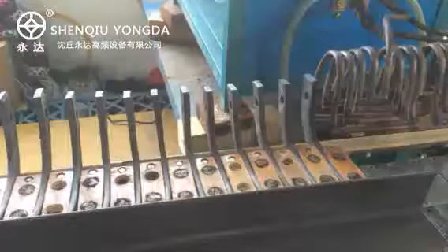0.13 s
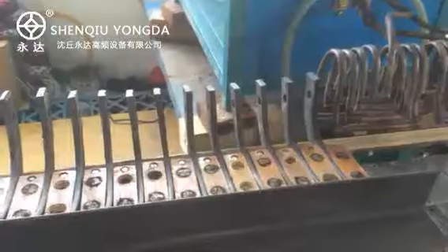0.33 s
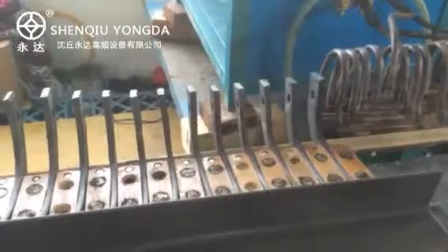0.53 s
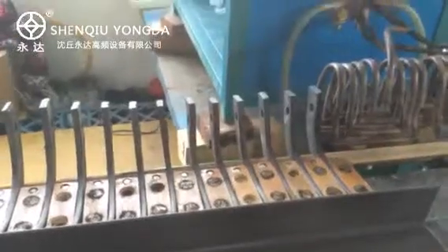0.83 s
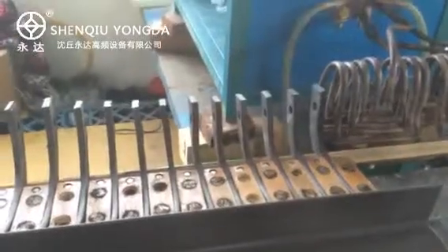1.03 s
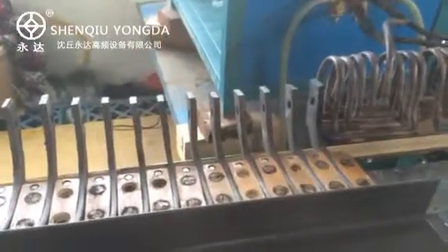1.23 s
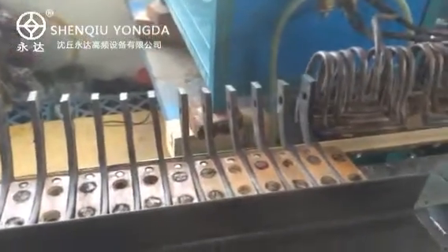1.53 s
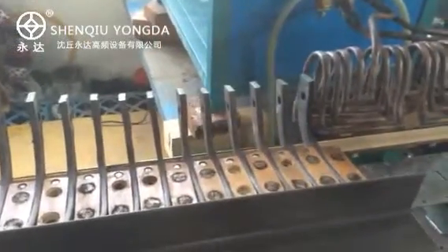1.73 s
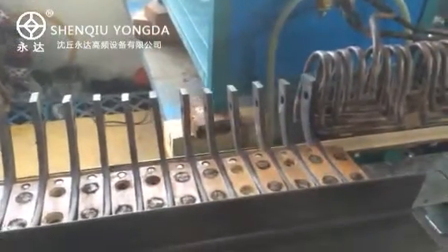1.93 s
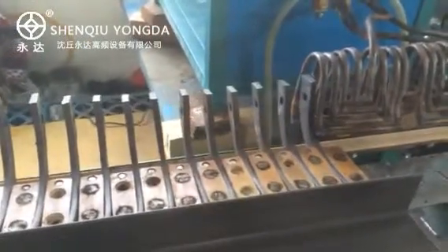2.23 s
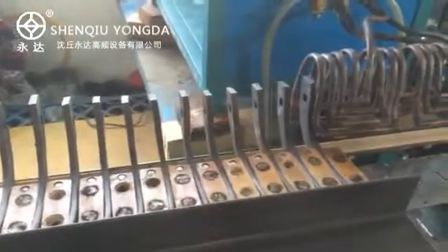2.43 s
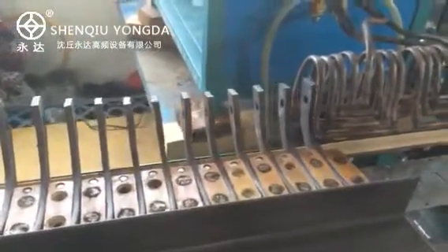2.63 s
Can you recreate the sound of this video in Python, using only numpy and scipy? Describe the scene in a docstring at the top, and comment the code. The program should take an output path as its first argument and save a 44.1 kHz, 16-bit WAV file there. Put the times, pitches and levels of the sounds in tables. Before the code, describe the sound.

An industrial induction heating line runs close to the microphone in a workshop. After brief silence it cuts in abruptly at 0.14 seconds, then holds a low fan roar, motor hum, hollow duct resonance, coolant rush and fine hiss, with pipes and steel ringing faintly. A rough whine near 6 kHz is strongest around 0.6 seconds, fading after 1.8, while thinner whistles trade strength until the end.

```python
"""In a workshop, with the microphone close by, an induction heating line runs steadily; it cuts in abruptly.
Fans and pumps make shaped noise and steady tones over a motor's hum, a set of multiples of its shaft rate.
Air sounds the ducts, coolant rushes and hisses, and noise rings the resonances of the frame and pipework.
In front, a jittering sine near 6 kHz, probably coolant forced through a valve, whines and slowly fades
while thinner, higher whistles trade strength."""
import sys
import numpy as np
from scipy import signal
from scipy.fft import rfft, irfft, next_fast_len
from scipy.io import wavfile
from scipy.ndimage import uniform_filter1d, map_coordinates

SR = 44100
rng = np.random.default_rng(int(sys.argv[2]) if len(sys.argv) > 2 else 0)


def unload_wav(signal):
    """Save mono or channel-first audio to the path in sys.argv[1] as 16-bit WAV at rate SR, clipped to [-1, 1]."""
    wavfile.write(
        sys.argv[1],
        SR,
        np.round(np.clip(np.atleast_2d(signal).T, -1, 1) * 32767).astype(np.int16),
    )


N = 122157  # samples

# Spectrum shape of the fans' roar: pitch_hz [Hz], level_db [dB, relative]
ROAR_SPECTRUM = [(20, -31), (45, -13), (105, -10.5), (135, -1.5), (175, -1), (290, -0.5), (380, -7.5),
                 (480, -17), (700, -25.5), (2000, -51)]
# Level of the roar: time_s [s], level_db [dB]
ROAR_LEVEL = [(.14, -28.5), (.5, -29), (1.1, -27.5), (1.65, -27), (2.1, -28), (2.77, -30)]
# Steady tones of other fans and pumps: pitch_hz [Hz], level_db [dB]
FAN_TONES = [(123, -43), (158, -38), (197, -41), (217, -40.5), (290, -43.5), (309, -38.5), (592, -46.5)]
# Motor hum: order [multiple of the shaft rate], level_db [dB]
MOTOR_ORDERS = [(2, -45), (4, -38.5), (6, -37.5), (8, -42.5), (9, -44)]
# Hollow resonances of the ducts: pitch_hz [Hz], width_hz [Hz], level_db [dB]
DUCTS = [(626.5, 40, -40.5), (809, 31, -39.5), (908, 64, -43.5)]
# How hard the flow drives the ducts: time_s [s], drive_db [dB]
DUCT_DRIVE = [(.14, -0.59), (.9, 2.1), (1.4, -.5), (2.1, -1.9), (2.77, 1)]
# Spectrum shape of the rush of air and coolant: pitch_hz [Hz], level_db [dB, relative]
RUSH_SPECTRUM = [(200, -15.5), (520, -4), (720, -1.5), (950, 1), (1150, -3), (1700, -6), (2300, -5),
                 (2650, -11.5), (3200, -12.5), (4400, -11), (5200, -17.5), (7000, -27), (15000, -55)]
# Level of the rush: time_s [s], level_db [dB]
RUSH_LEVEL = [(.14, -29), (.8, -30), (1.4, -30), (1.9, -30.5), (2.77, -29)]
# Spectrum shape of the fine spray hiss: pitch_hz [Hz], level_db [dB, relative]
HISS_SPECTRUM = [(2500, -23), (5000, -3.5), (6400, 8), (6830, -7.5), (7200, -1), (8100, 2), (9300, -3.5),
                 (10300, 2.5), (11200, -2.5), (13400, -3.5), (14300, 0), (15300, -4.5)]
# Level of the hiss: time_s [s], level_db [dB]
HISS_LEVEL = [(.14, -39.5), (1.3, -38.5), (2.1, -38), (2.77, -38)]
# Resonances of frame and pipework: pitch_hz [Hz], width_hz [Hz], level_db [dB]
FRAME = [(1414, 38, -45), (1844, 15, -48), (1956, 32, -41.5), (2010, 29, -44.5), (2212, 41, -48.5),
         (2284, 20, -39.5), (2472, 17, -50.5)]
# Thin ringing of the steel bars and coil: pitch_hz [Hz], level_db [dB]
STEEL = [(3390, -52.5), (3685, -51.5), (3935, -54.5), (4112, -47), (4243, -48), (4345, -49.5),
         (4380, -50.5), (4694, -52), (4985, -63.5), (7870, -52), (8280, -55.5), (8600, -56.5), (9920, -57),
         (11530, -52), (12000, -62), (12780, -55), (13500, -59), (15130, -62)]
# Times of the whistle levels: time_s [s]
WHISTLE_TIMES = [.4, 1.3, 1.9, 2.6]
# Higher whistles: pitch_hz [Hz], width_hz [Hz], then level_db [dB] at each of the four times
WHISTLES = [(6198, 40, -47.5, -38.5, -46.5, -43), (6477, 24, -53, -59, -46, -40),
            (10150, 110, -45.5, -47, -61, -70), (10940, 60, -62, -64, -46, -53),
            (14050, 50, -56, -55, -55, -45), (14240, 90, -51, -52, -52, -53),
            (14440, 80, -47, -50, -54, -62)]
# The main whine: time_s [s], pitch_hz [Hz], level_db [dB]
WHINE = [(.14, 6070, -40), (.35, 6110, -39), (.6, 6092, -34), (.85, 6110, -37), (1.15, 6100, -36.5),
         (1.55, 6140, -39), (1.8, 6160, -38), (2.0, 6130, -45.5), (2.77, 6160, -52)]

START_S, TOP_HZ = 0.1435, 15400  # the cut-in, and the upper band limit
SHAFT_HZ, SHAFT_DRIFT = 44.77, 0.003  # motor turns a second, relative unsteadiness
HISS_RIPPLE_DB, HISS_RIPPLE_HZ = 2, 75.3  # depth and knot spacing of the ripple in the hiss
STEEL_WIDTH_HZ = 13.3  # at the lowest steel pitch; widens in proportion to pitch
WHISTLE_FLUTTER_DB = 3.5
WHINE_JITTER_HZ, WHINE_JITTER_RATE, WHINE_FLUTTER_DB = 36.04, 170, 3  # rate in knots a second


def amp(db):
    """Decibels to gain."""
    return 10 ** (np.asarray(db) / 20)


def unit(x):
    """Scale to rms 1."""
    return x / np.sqrt(np.mean(x ** 2) + 1e-20)


def curves(rows):
    """One value per sample for each column after the time."""
    time_s, *columns = np.transpose(rows)
    return [np.interp(np.arange(N) / SR, time_s, column) for column in columns]


def wobble(rate):
    """A smooth random curve through normal draws, rate knots a second."""
    knots = rng.standard_normal(4096)
    return map_coordinates(knots, [np.arange(N) * rate / SR], mode="mirror")


def filtered(x, response):
    """Multiply the spectrum of x by a response of frequency."""
    size = next_fast_len(N + 8192)
    spectrum = rfft(x, size) * response(np.fft.rfftfreq(size, 1 / SR))
    return irfft(spectrum, size)[:N]


def flow(spectrum, patchy_db):
    """Turbulence: coloured noise of rms 1 with time-frequency patches of random gain."""
    bins = signal.stft(rng.standard_normal(N), nperseg=512)[2]
    patches = uniform_filter1d(rng.standard_normal(bins.shape), size=8, axis=0)  # across pitch
    patches = uniform_filter1d(patches, size=10, axis=1)  # across time
    noise = signal.istft(bins * amp(patchy_db * unit(patches)), nperseg=512)[1][:N]
    hz, db = np.transpose(spectrum)
    return unit(filtered(noise, lambda f: amp(np.interp(np.log(f + 1), np.log(hz), db))))


def ringing(hz, width_hz):
    """One resonance kept ringing by turbulence, rms 1; gain is a third at width_hz off pitch."""
    noise = rng.standard_normal(N)
    return unit(filtered(noise, lambda f: 1 / (1 + ((f - hz) / width_hz) ** 2 * 2)))


def tone(hz):
    """A sine of rms 1 on a pitch curve, from a random phase."""
    turns = np.cumsum(hz) / SR + rng.random()
    return np.sqrt(2) * np.sin(2 * np.pi * turns)


def combed(x):
    """Many short echoes off the steel leave a fine, fixed ripple in the spectrum."""
    knots = rng.standard_normal(2048)

    def ripple(f):
        return np.tanh(map_coordinates(knots, [f / HISS_RIPPLE_HZ], mode="mirror"))

    return unit(filtered(x, lambda f: amp(HISS_RIPPLE_DB * unit(ripple(f)))))


def fans():
    """Low turbulent roar with a few steady blade tones."""
    level_db, = curves(ROAR_LEVEL)
    out = amp(level_db + 0.4 * wobble(11.9)) * flow(ROAR_SPECTRUM, patchy_db=1.77)
    for hz, db in FAN_TONES:
        out += amp(db + 3.1 * wobble(5.04)) * tone(hz * (1 + 0.005 * wobble(7)))
    return out


def motor():
    """Hum at multiples of one slightly unsteady shaft rate."""
    shaft_hz = SHAFT_HZ * (1 + SHAFT_DRIFT * wobble(3.905))
    return sum(amp(db + 2.4 * wobble(4.99)) * tone(round(order) * shaft_hz) for order, db in MOTOR_ORDERS)


def ducts():
    """Air sounds the hollow resonances of the ducts, driven by a shared slow curve."""
    drive_db, = curves(DUCT_DRIVE)
    return sum(amp(db + drive_db) * ringing(hz, width_hz) for hz, width_hz, db in DUCTS)


def coolant():
    """Broad rush and fine, rippled hiss of turbulent flow."""
    rush_db, = curves(RUSH_LEVEL)
    hiss_db, = curves(HISS_LEVEL)
    rush_gain = amp(rush_db + 0.25 * wobble(8.9) + 0.9 * wobble(130))
    hiss_gain = amp(hiss_db + 0.4 * wobble(90))
    rush = rush_gain * flow(RUSH_SPECTRUM, patchy_db=0.9)
    return rush + hiss_gain * combed(flow(HISS_SPECTRUM, patchy_db=1.0))


def steelwork():
    """Turbulence keeps the frame, pipes, bars and coil ringing without pause."""
    frame = sum(amp(db) * ringing(hz, width_hz) for hz, width_hz, db in FRAME)
    relative_width = STEEL_WIDTH_HZ / STEEL[0][0]
    return frame + sum(amp(db) * ringing(hz, relative_width * hz) for hz, db in STEEL)


def whistles():
    """Thin whistles jitter about fixed pitches and trade strength slowly."""
    out = np.zeros(N)
    for hz, width_hz, *levels_db in WHISTLES:
        level_db, = curves(list(zip(WHISTLE_TIMES, levels_db)))
        pitch_hz = hz + 0.454 * width_hz * wobble(2 * width_hz)
        flutter = amp(WHISTLE_FLUTTER_DB * wobble(width_hz))  # wider whistles also flutter faster
        out += amp(level_db) * unit(flutter * tone(pitch_hz))
    return out


def whine():
    """A rough whistle whose pitch jitters quickly and creeps up as it fades."""
    pitch_hz, level_db = curves(WHINE)
    jittered_hz = pitch_hz + WHINE_JITTER_HZ * wobble(WHINE_JITTER_RATE)
    flutter = amp(WHINE_FLUTTER_DB * wobble(110))
    return amp(level_db) * unit(flutter * tone(jittered_hz))


def scene():
    """All parts of the line run together, from the background to the whine in front."""
    background = fans() + motor() + ducts() + coolant() + steelwork()
    return (background + whistles() + whine())[None]


def record(dry):
    """The sound cuts in over 2.5 ms; a steep low-pass removes what lies above the band limit."""
    opened = np.clip((np.arange(N) / SR - START_S) / 0.0025 + 0.5, 0, 1)
    return filtered(dry[0] * opened, lambda f: 1 / (1 + (f / TOP_HZ) ** 400))[None]


dry = scene()
out = record(dry)
unload_wav(out)
```